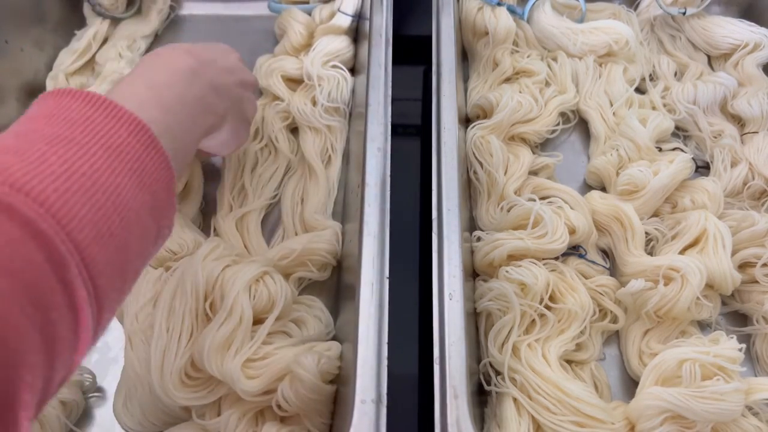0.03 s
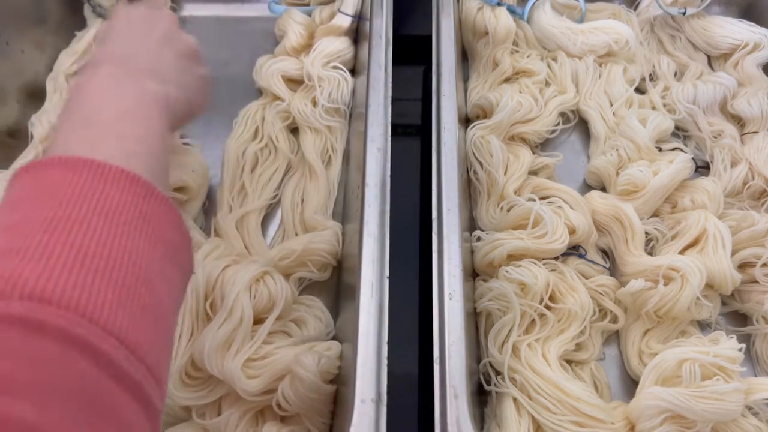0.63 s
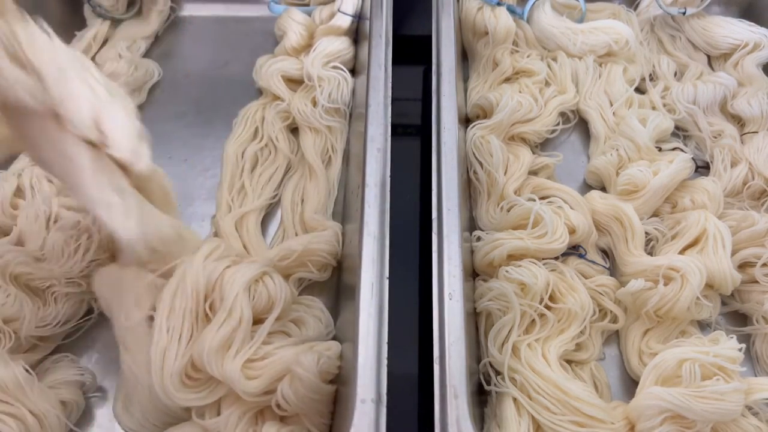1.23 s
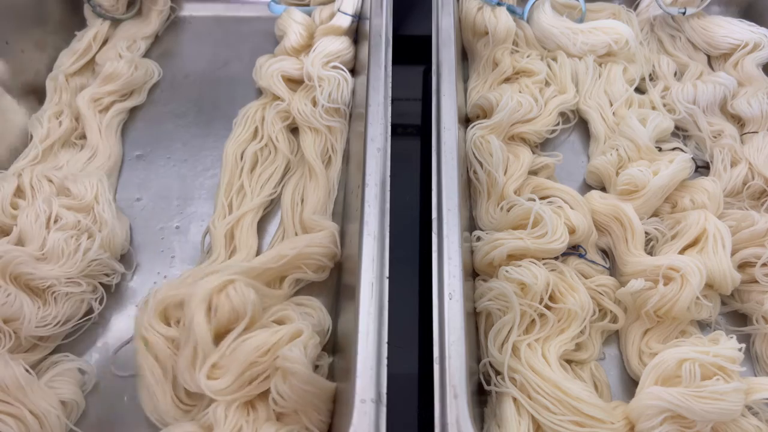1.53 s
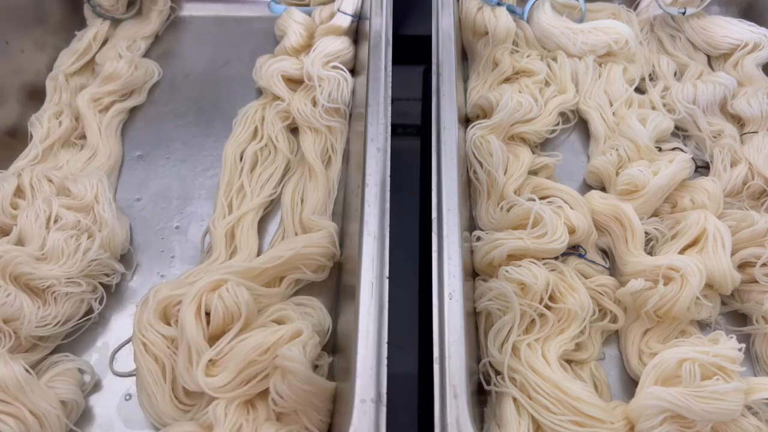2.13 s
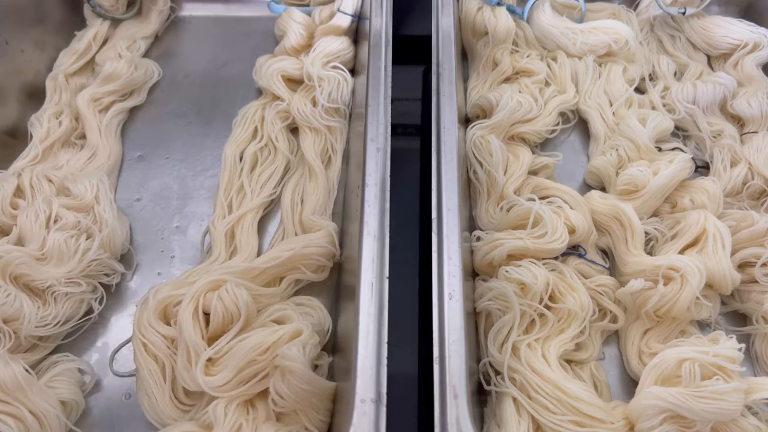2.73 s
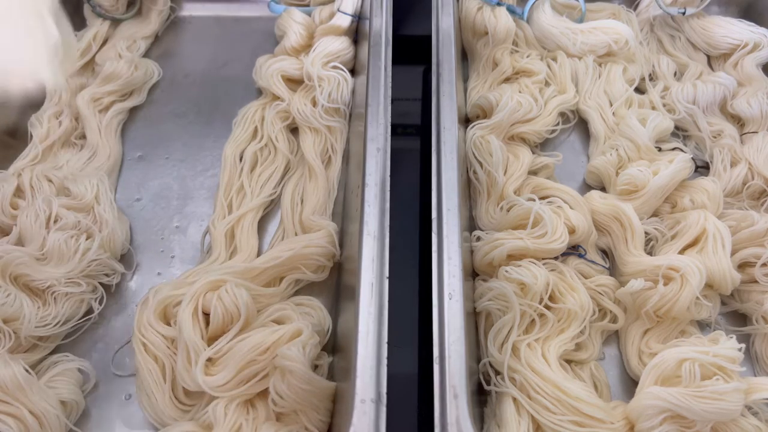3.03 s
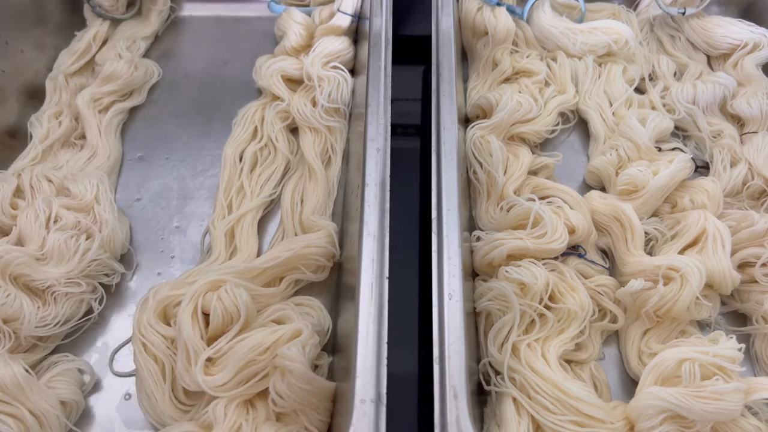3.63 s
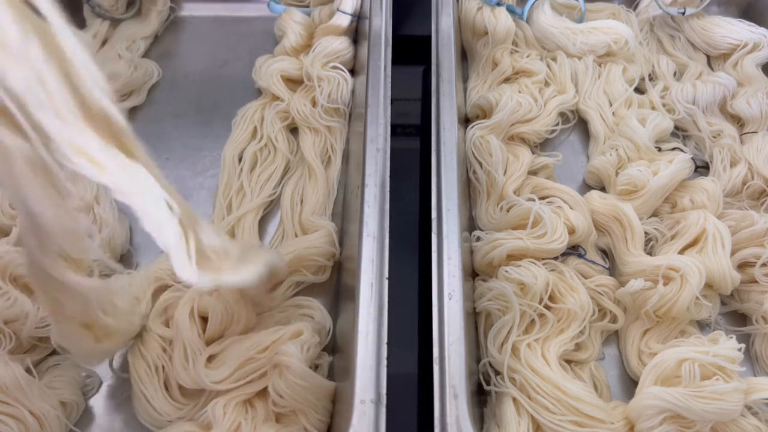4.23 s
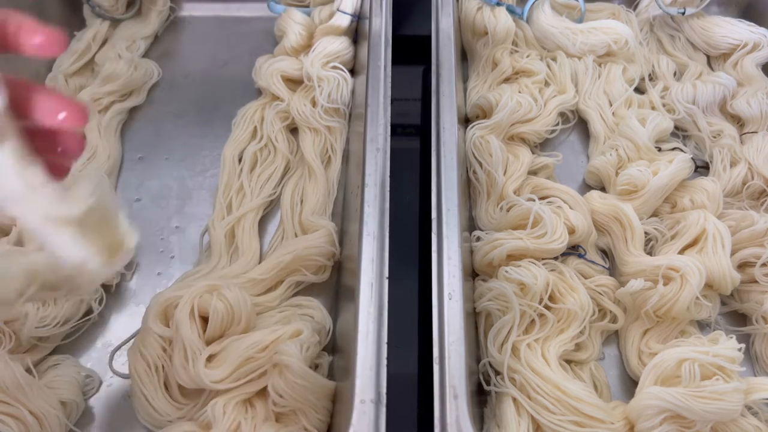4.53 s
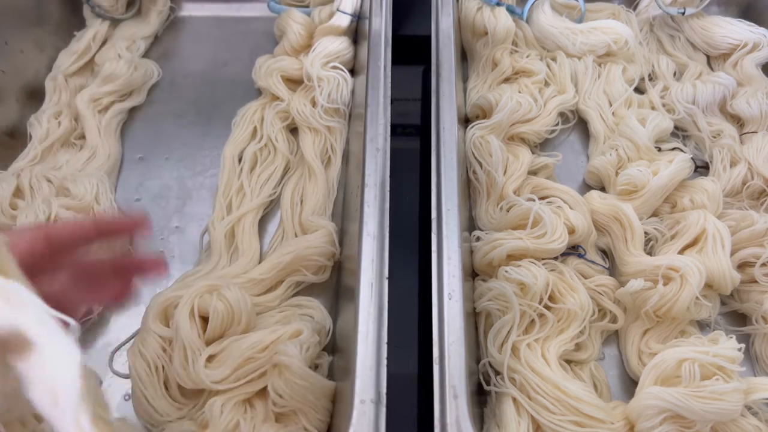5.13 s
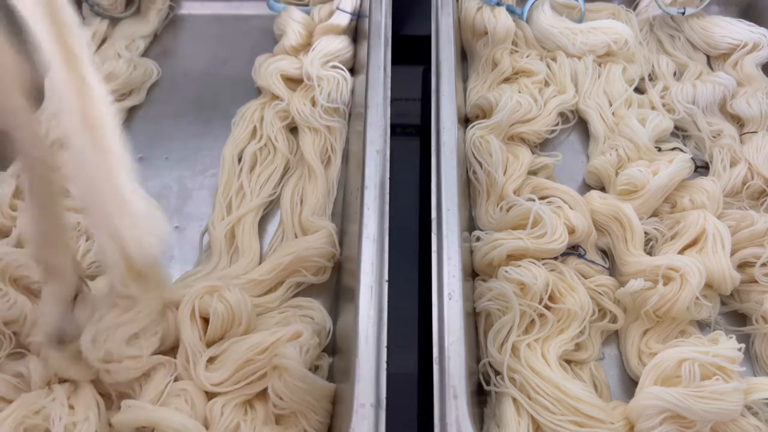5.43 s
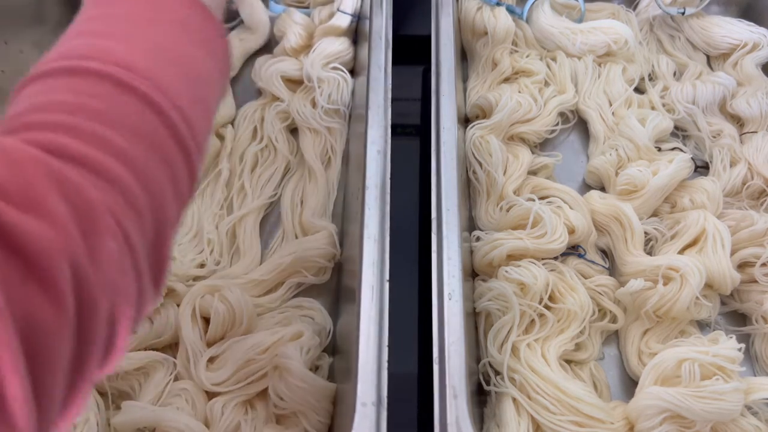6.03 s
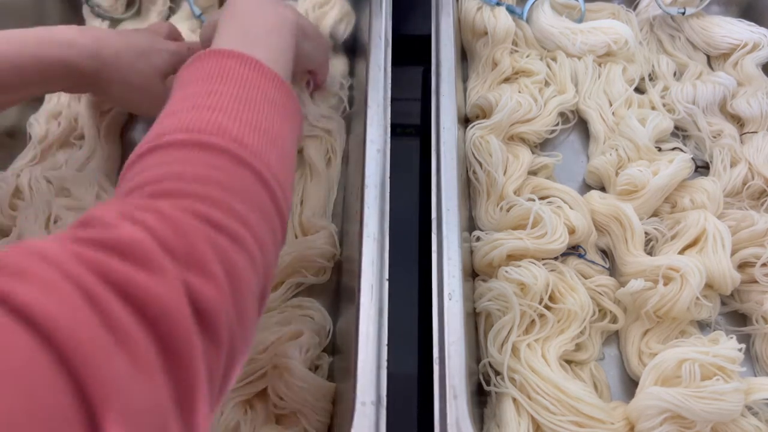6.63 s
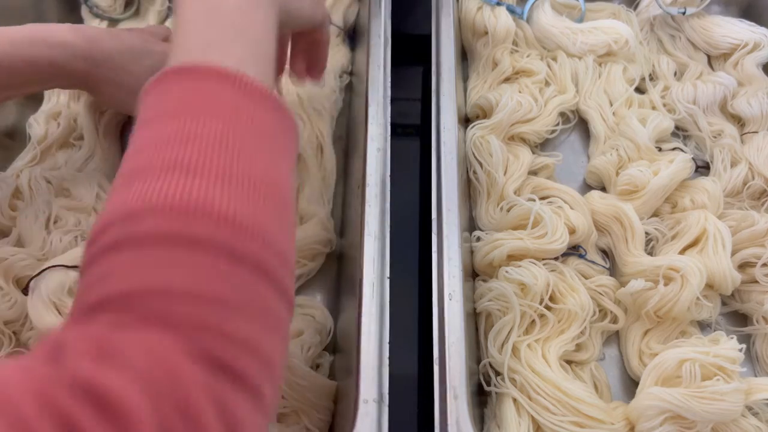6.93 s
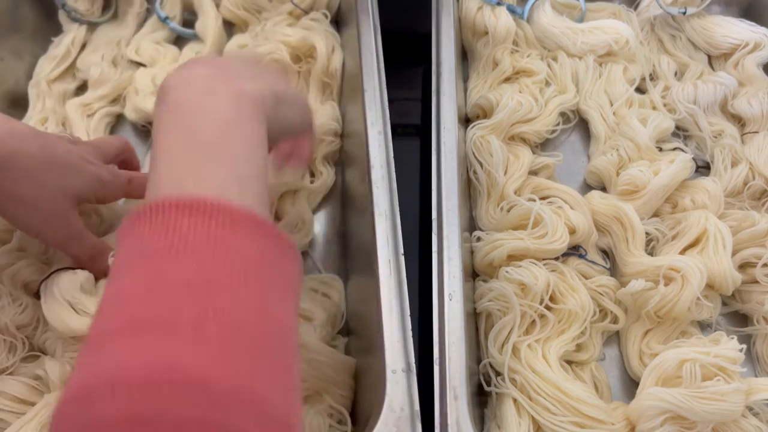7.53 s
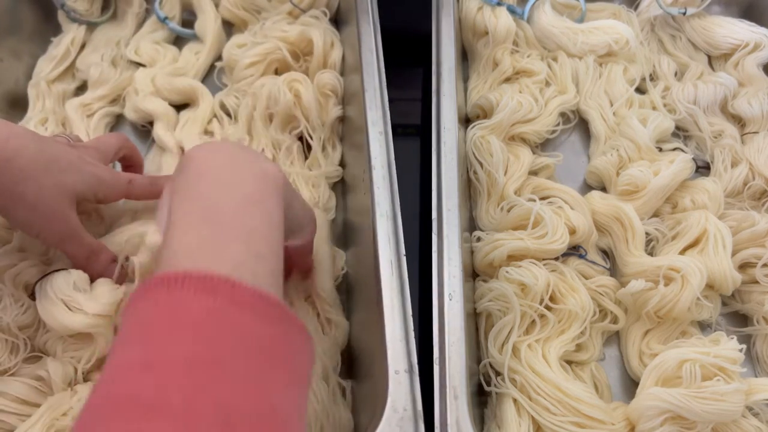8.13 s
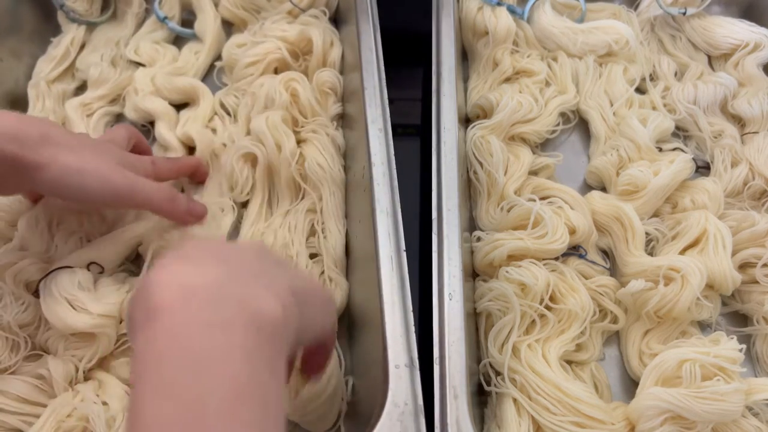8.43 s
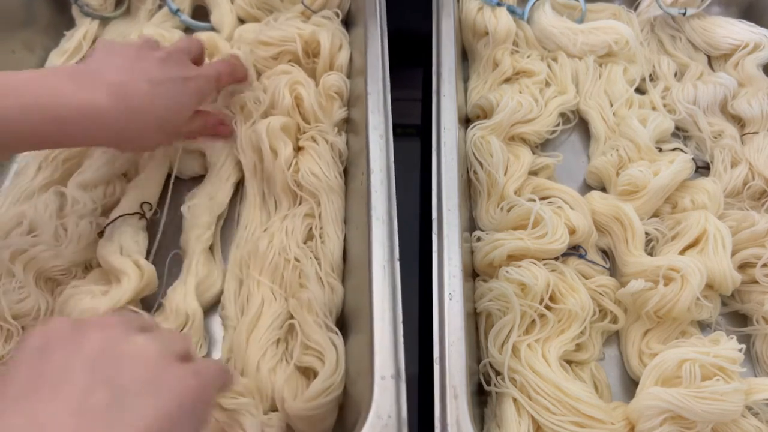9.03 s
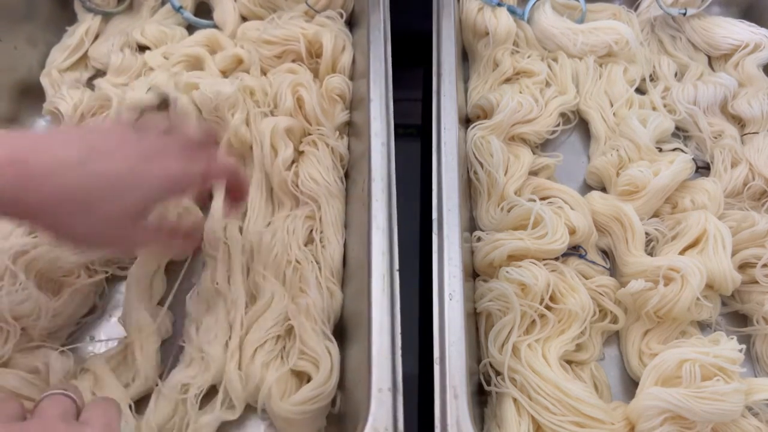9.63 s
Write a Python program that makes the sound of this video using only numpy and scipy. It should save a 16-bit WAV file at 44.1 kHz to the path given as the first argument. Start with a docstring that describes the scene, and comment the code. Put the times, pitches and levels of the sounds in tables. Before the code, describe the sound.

Wet yarn brushes and hisses softly close to the microphone, over the steady low rumble and hum of ventilation in a small work room. A few muffled thuds land in a steel pan before 1 second. Light rustling and tiny wet ticks follow, with a faint tap at 1.5 seconds. Skeins slap down with light knocks around 4.1 and 5.5 seconds, as the ticks thicken. At 5.9 seconds comes the loudest sound, a quick clattering knock that rings the steel. Smaller knocks and two short scrapes follow between 6.3 and 6.8 seconds. Yarn and a sleeve then swish in repeated strokes, with dull, booming thuds at 7.8 and 8.2 seconds. The rim clinks lightly at 8.8 seconds, and a firm wet slap hits the pan at 9.2 seconds. A last small knock and rustle come at about 9.7 seconds.

```python
"""A close rustle of wet yarn and a sleeve, then soft thuds: skeins are laid by hand in a steel pan.
Slipping fibres hiss and fizz, and strands part with tiny ticks. Each skein slaps down and booms
the pan floor; hard knocks ring the steel, joined by two short scrapes and a light clink on the rim.
Behind it all, the ventilation of a small work room rumbles and hums."""
import sys
import numpy as np
from scipy import signal
from scipy.fft import rfft, irfft, next_fast_len
from scipy.io import wavfile
from scipy.ndimage import uniform_filter1d

SR = 44100
rng = np.random.default_rng(int(sys.argv[2]) if len(sys.argv) > 2 else 0)


def transcribe(signal):
    """Save signal, clipped to [-1, 1], as a 16-bit WAV file at the path in sys.argv[1]."""
    frames = np.atleast_2d(signal).T
    limited = np.clip(frames, -1, 1)
    pcm = np.round(limited * 32767).astype(np.int16)
    wavfile.write(sys.argv[1], SR, pcm)


N = 435266

# soft blows of yarn and hand: start_s, floor_pitch_hz, pitch_drop_s, after_ring_db (against the
# first swing), boom_db, ring_db, ring_pitch_hz, slap_db
SOFT_BLOWS = [(.556, 140, 0.0025, -13, -45.5, -49.5, 290, -64.5),
              (.594, 149, 0.0016, -4, -47, -58, 270, -67.5), (.636, 70, .003, -10, -47, -61, 280, -78),
              (.714, 148, 0.0029, -7, -47, -49, 270, -63), (.752, 150, 0.0014, -12, -50, -55, 280, -73),
              (1.570, 112, 0.0033, -2, -53, -72, 300, -73),
              (4.117, 120, 0.0033, -20, -40.5, -42.5, 260, -52),
              (4.151, 112, 0.0019, -16, -39, -46, 260, -62.5),
              (5.557, 69, 0.00336, 9, -35.5, -42, 350, -45), (7.786, 132, .0029, -12, -36, -43, 304, -54.5),
              (8.196, 135, 0.0041, -9.5, -30, -37, 260, -48),
              (8.583, 126, 0.0027, -10, -45.5, -59, 300, -65.5),
              (9.246, 120, 0.0077, -15, -30, -29.5, 447, -42)]
# hard contacts with the steel: start_s, level_db, body_offset_db, brightness_db, spot_pitch_hz,
# spot_emphasis_db, clatter_t60_s, crack_strength
HARD_KNOCKS = [(1.485, -63, -13, -1, 1360, 26, .26, .25), (4.021, -57.5, -6.5, -2, 1000, 0, .11, .22),
               (4.152, -64, -9, 1, 3030, -11, .1, .88), (5.265, -68.5, -19, 10, 2500, -12, 0.2, .3),
               (5.506, -57, -1, -7, 1200, 1, .084, 0.91), (5.861, -25, -3, -4.5, 782, -0.5, .25, .8),
               (5.872, -33, -12, -0.5, 684, 0, 0.32, .5), (5.923, -31.5, -19, 0, 526, 4, 0.098, 2),
               (6.353, -58.5, 7.5, -9.5, 337, 11, 0.11, .12),
               (6.607, -47.5, -17, 8, 2180, 12.5, 0.11, 0.23), (6.620, -48.5, -8, -1.5, 900, 14, .2, .9),
               (6.665, -52.5, -8, -1, 1100, 8.5, 0.27, .2), (8.799, -51.5, -11, 1.5, 2280, 0, .09, 1.3),
               (9.246, -46, -15, 3.5, 1750, 9, 0.055, 2), (9.382, -65, -12, 5, 1600, 4, .08, .3),
               (9.704, -50.5, 1, -5, 610, -23, 0.17, 1.7)]
# ring, clatter and treble registers of a knock: offset_db, db_per_brightness_db
KNOCK_REGISTERS = [(-1.5, -0.59), (0.5, 0.8), (-5.5, 0.82)]
# modes of the steel pan: pitch_hz, level_db, base_t60_s
PAN_MODES = [(63.6, -14.5, 0.84), (133, -22.5, 0.71), (168.9, 3.5, 0.27), (225.5, -8.5, 0.56),
             (252.4, 6, 0.17), (308.5, 3.5, 0.18), (352, -1.5, 0.47), (390, 1.5, 0.62), (461, 0, 0.61),
             (499.5, 9, 0.29), (515.4, 7.5, 0.36), (615, 0.5, 0.4), (698, 7, 0.37), (731, -5.5, 0.2),
             (792, 6.5, 0.22), (829, -4, 0.36), (874, -1.5, 0.45), (1060, -10, .35), (1141, -1, 0.39),
             (1327, -8.5, 0.28), (1441, 8, 0.22), (1520, -7, 0.33), (1570, -6, 0.25), (1725, -6.5, 0.38),
             (2000, -8, 0.36), (2260, -7, 0.34), (2430, -8.5, 0.28), (3760, -2, 0.29), (3980, -6.5, 0.34),
             (4300, -13, 0.3), (4540, -5, 0.33), (4990, -1, 0.3), (5650, -5, 0.3)]
# hand and skein stroking the yarn: start_s, length_s, end_level_db, swell_db, brush_offset_db,
# fizz_offset_db
YARN_STROKES = [(.05, 0.18, -78, 15, 8, -1), (0.213, 0.068, -70.5, -8, 9.5, -2),
                (0.278, 0.35, -75.5, 1.5, 3, 2.5), (0.667, 0.21, -79.5, 0, 8, 4),
                (0.924, 0.41, -68.5, 3.5, 4.5, 0.5), (1.36, 0.21, -73.5, 1, 4, 3),
                (1.594, 0.72, -72, 1, 2.5, 3.5), (2.175, 0.19, -68.5, 21, 3, 6.5),
                (2.37, 0.43, -66.5, 11.5, 3, 4.5), (2.906, 0.21, -71.5, 13, 6.5, 2.5),
                (3.182, 0.16, -71.5, -2, -1, 3.5), (3.379, 0.16, -64.5, 0.5, 1.5, 3),
                (3.601, 0.11, -59, 1.5, -3.5, 1.5), (3.735, 0.28, -60, 4, -2, 1.5),
                (4.08, 0.49, -83, -15.5, 8, 3.5), (4.98, 0.39, -70, 9, 4, 3),
                (5.252, 0.02, -57, 3, -11, -3), (5.283, 0.11, -58.5, 2, 2.5, 0),
                (5.412, 0.2, -63.5, -3.5, 3.5, 0), (5.614, 0.28, -74, -3, 5.5, 0),
                (6.27, .1, -75.5, 2, -3, 1), (6.365, 0.044, -55.5, 1, 8, -6.5),
                (6.5, 0.21, -60, 14.5, 8, -5), (7.007, 0.36, -62, 12, 6.5, -3.5),
                (7.59, 0.22, -61, 8, 6.5, -3), (7.996, 0.2, -62.5, 13, 4.5, -1.5),
                (8.404, 0.48, -62.5, 5, 2.5, -2.5), (8.724, 0.26, -68.5, -6, 5.5, 1),
                (9.155, 0.34, -64, 5, 5.5, 0.5), (9.58, 0.24, -57, 15, 5, -3.5)]
# rubbing that goes on between strokes: brush_db, swish_db, fizz_db
RESTING_RUB = (-81, -93.5, -80)
# borders of the sleeve's crackle bands: edge_hz
SWISH_EDGES = [1500, 2900, 3700, 4700, 6000, 16000]
# wet strands parting: start_s, peak_db, centre_hz
STRAND_TICKS = [(1.3104, -47, 8500), (1.544, -53, 2400), (1.984, -45, 8500), (2.4696, -47, 9500),
                (2.609, -46, 9000), (3.020, -49, 7050), (3.036, -48, 7900), (3.6231, -45, 8500),
                (3.913, -47, 4270), (4.01, -42, 4730), (4.249, -51, 3300), (4.363, -50, 5870),
                (4.601, -51.5, 8800), (4.769, -52.5, 8600), (5.2055, -50, 8600), (5.340, -38.5, 3600),
                (5.347, -44, 2800), (5.376, -42, 4600), (5.419, -41, 5000), (5.478, -42.5, 2380),
                (5.506, -35.5, 8500), (5.611, -46, 3600), (8.633, -56, 7900), (9.256, -37, 7500),
                (9.669, -46, 7500), (9.719, -51, 6000)]
# drags on the steel: start_s, length_s, level_db, low_pitch_hz, high_pitch_hz, high_offset_db, t60_s
STEEL_SCRAPES = [(6.391, 0.032, -59, 2630, 4530, 4, 0.11), (6.627, 0.12, -57.5, 1550, 1800, -3.5, 0.32)]
# light touches on the rim: start_s, level_db
RIM_TOUCHES = [(8.776, -63), (8.799, -47)]
# modes of the rim: pitch_hz, level_db, t60_s
RIM_MODES = [(1990, -7, 0.22), (2070, 1, 0.082), (2530, -0.5, 0.057), (3680, -2.5, 0.069), (4500, -11, .16),
             (4915, -15, .18), (7000, 1, .018), (8150, -5, .05)]
# EQ curves of slap, knock, brushing yarn, sleeve, wet fizz and vent air: frequency_hz, gain_db
SLAP_EQ = [(50, -4), (300, -0.5), (520, -7.5), (900, -9), (2200, -19), (4000, -19.5), (8000, -26.5),
           (15000, -33)]
KNOCK_EQ = [(60, -21), (170, -1), (300, -16.5), (400, -6), (550, 4), (850, -6), (1080, -9), (1520, -10),
            (2200, -8), (2900, -16.5), (4000, -11.5), (5500, -14.5), (8000, -15.5), (12500, -31.5),
            (15500, -30)]
BRUSH_EQ = [(250, -19), (500, 5), (900, 0.5), (1500, 1.5), (2400, 2.5), (4000, -18.5), (8000, -18)]
SWISH_EQ = [(1500, -27), (2800, 3), (4200, 3), (5200, 2.5), (6500, -0.5), (8500, 4), (11000, -20),
            (15000, -28.5)]
FIZZ_EQ = [(4000, -22), (6500, -6), (8000, 0), (12000, -1.5), (15500, -2.5)]
AIR_EQ = [(15, -81), (25, -27.5), (40, -0.5), (64, 5.5), (77, -3.5), (87, -17.5), (108, -12), (145, -15.5),
          (163, -13), (284, -8), (429, -16.5), (523, -15), (650, -27.5), (1120, -31.5), (1800, -39),
          (2250, -35), (2600, -36.5), (2850, -42), (3640, -55), (6160, -120)]
# partials of the ventilation motor: pitch_hz, level_db
MOTOR_HUM = [(59.3, -51.3), (74, -60), (118.6, -62.5), (148, -68), (172.5, -64), (215.5, -61), (258, -65),
             (281, -63), (344.5, -64)]
# stereo likeness; short waves reach the two microphone ports out of step: frequency_hz, correlation
STEREO_LIKENESS = [(60, .99), (150, .95), (280, .68), (600, .3), (1400, .15), (7500, 0), (9000, -.6),
                   (9700, -.97), (10700, -.97), (11400, .3), (12500, .9), (14000, .8), (15500, .3)]
# balance of the microphone ports: frequency_hz, left_minus_right_db
PORT_BALANCE = [(60, 1), (250, 0.4), (550, 2.5), (1100, 1), (2300, 3.5), (4000, 5.5), (5600, 9.5),
                (7500, 4), (10000, -7), (15000, 3)]

HIT_S, ATTACK_S = .6, .045  # length of a hit, and the opening stretch that sets its level
SWING_S, FLOOR_T60_S = .0075, .52  # the pan floor's first swing peaks, then it rings on
SPRAY_DB, MID_SLAP_DB, SPRAY_GROWTH = -66, -50, 1.75  # spray at a middling slap; dB per dB of slap
GRIP_S, SETTLE_S = .072, .071  # attack and release of a stroke; short strokes are quicker


def skein_thuds():
    """Wet yarn lands: a slap, a spray, a muffled ring and one wide, smothered swing of the pan floor."""
    out, t = np.zeros((2, N)), times(HIT_S)
    modes = pan_modes(t, damping=1.3)
    for start_s, floor_hz, drop_s, after_db, boom_db, ring_db, ring_hz, slap_db in SOFT_BLOWS:
        # short bending waves run fastest, so the pitch drops onto that of the loaded floor
        hz = floor_hz + 650 * np.exp(-t / drop_s)
        swing = t / SWING_S * np.exp(1 - t / SWING_S)
        after_ring = undb(after_db) * fade(t, FLOOR_T60_S) * (1 - np.exp(-t / .011))
        flex = (swing + after_ring) * np.sin(2 * np.pi * np.cumsum(hz) / SR)
        slap = contact(t, crack=.9, crack_s=.00176, early_t60=.077, room_t60=.34, room_db=-5)
        slap = eq(slap, SLAP_EQ)
        steel = pan_ring(modes)
        body = hit_level(slap, 0) + hit_level(band(steel, 170, 500), -11)
        ring = struck_spot(body, ring_hz, -2.1, q=3.8)
        linger = band(diffuse(len(t)), 91, 194) * fade(t, .56) * (1 - np.exp(-t / .0076))
        boom = hit_level(np.array([flex, flex]), 0) + hit_level(linger, -6)
        boom += hit_level(band(steel, 52, 131), -5)
        spray = contact(t, crack=4.5, crack_s=.0016, early_t60=.066, room_t60=.33, room_db=-4)
        spray_db = SPRAY_DB + SPRAY_GROWTH * (slap_db - MID_SLAP_DB)
        thud = (hit_level(boom, boom_db)
                + hit_level(band(ring, 202, 680), ring_db)
                + hit_level(band(slap, 730, 3030), slap_db)
                + hit_level(band(eq(spray, SLAP_EQ), 3810, 19000), spray_db))
        add(out, thud, start_s)
    return out


def steel_knocks():
    """Hard contacts ring the steel; a brighter one shifts its weight into the high registers."""
    out, t = np.zeros((2, N)), times(HIT_S)
    edges_hz = [130, 280, 1000, 3100, 17000]  # body, ring, clatter, treble
    modes = pan_modes(t, damping=.88)
    for start_s, knock_db, body_db, bright_db, spot_hz, spot_db, t60, crack in HARD_KNOCKS:
        register_db = [knock_db + body_db]
        register_db += [knock_db + db + tilt * bright_db for db, tilt in KNOCK_REGISTERS]
        clatter = contact(t, 1.27 * crack, crack_s=.0027, early_t60=t60, room_t60=.42, room_db=-5.5)
        # only a heavy blow sets the whole pan ringing
        ring_db = max(-2.5 + .42 * (register_db[1] + 36), -8)
        steel = hit_level(eq(clatter, KNOCK_EQ), 0) + hit_level(pan_ring(modes), ring_db)
        steel = struck_spot(steel, spot_hz, spot_db, q=3.9)
        steel = struck_spot(steel, 1.61 * spot_hz, spot_db - 12.5, q=18.6)  # weaker overtone
        for lo, hi, db in zip(edges_hz, edges_hz[1:], register_db):
            add(out, hit_level(band(steel, lo, hi), db), start_s)
        # the instant of contact is the brightest
        snap = band(diffuse(len(t)), 7000, 17000) * np.exp(-t / .006)
        add(out, np.sqrt(crack) * hit_level(snap, register_db[-1] - 12), start_s)
    return out


def contact(t, crack, crack_s, early_t60, room_t60, room_db):
    """A push and a crack, a flurry of sheet vibration, then a room tail whose treble dies first."""
    push = .41 * np.sin(np.pi * np.minimum(t / .00032, 1))
    direct = push + diffuse(len(t)) * (fade(t, early_t60) + crack * np.exp(-t / crack_s))
    room = diffuse(len(t))
    tail = band(room, 42, 4900) * fade(t, room_t60) + band(room, 6700, 15000) * fade(t, room_t60 / 2)
    return direct + undb(room_db) * tail * (1 - np.exp(-t / .0041))


def pan_modes(t, damping):
    """Each mode of the pan is a beating cluster of three, spread wider higher up."""
    hz, db, t60 = np.transpose(np.repeat(PAN_MODES, 3, axis=0))[:, :, None]
    spread = np.tile([-1, 0, 1], len(PAN_MODES))[:, None] * rng.uniform(.6, 1.6, hz.shape)
    detune_hz = (5 + .005 * hz) * spread
    return undb(db) * fade(t, t60 / damping) * np.exp(2j * np.pi * (hz + detune_hz) * t)


def pan_ring(modes):
    """Each blow wakes its own mix of modes; high ones reach left and right out of step."""
    hz = np.repeat(np.array(PAN_MODES)[:, 0], 3)
    strength, skew = rng.standard_normal((2, len(hz)))
    phase = rng.uniform(0, 2 * np.pi, len(hz)) + np.outer([1, -1], skew * np.minimum(hz / 800, .9))
    return ((undb(2 * strength) * np.exp(1j * phase)) @ modes).imag


def struck_spot(x, hz, db, q):
    """The place that is struck favours one region of the pan's ringing."""
    return x + undb(db) * signal.lfilter(*signal.iirpeak(min(hz, .4 * SR), q, fs=SR), x)


def yarn_rustle():
    """Yarn brushes over yarn, the sleeve swishes, wet fibres fizz."""
    brush_gain, swish_gain, fizz_gain = stroke_envelopes()
    brush = eq(fibres(slips_per_s=510, spread_db=4, grain_db=-24.5), BRUSH_EQ)
    # as different strands catch, the emphasis wanders from band to band
    cloth = np.zeros((2, N))
    for lo, hi in zip(SWISH_EDGES, SWISH_EDGES[1:]):
        crackle = fibres(slips_per_s=260, spread_db=3.5, grain_db=-4.5)
        cloth += band(crackle, lo, hi) * undb(1.7 * drift(16))
    swish = eq(cloth, SWISH_EQ)
    fizz = eq(fibres(slips_per_s=420, spread_db=4.4, grain_db=-3.5), FIZZ_EQ)
    return (level(brush, -4.5) * brush_gain
            + level(swish, .26) * swish_gain
            + level(fizz, .5) * fizz_gain)


def stroke_envelopes():
    """Gains of brush, swish and fizz: a stroke takes hold, swells or eases as it pulls, then settles."""
    power, t = np.zeros((3, N)), times(1.2)
    for start_s, length_s, end_db, swell_db, brush_db, fizz_db in YARN_STROKES:
        grip = np.sin(np.pi / 2 * np.minimum(t / min(GRIP_S, length_s), 1)) ** 2
        pull = undb(end_db + swell_db * (np.minimum(t / length_s, 1) - 1))
        settle = np.exp(-np.maximum(t - length_s, 0) / min(SETTLE_S, 1.2 * length_s))
        add(power, np.outer(undb([brush_db, 0, fizz_db]), grip * pull * settle) ** 2, start_s)
    return np.sqrt(power + undb(RESTING_RUB)[:, None] ** 2)


def fibres(slips_per_s, spread_db, grain_db):
    """Countless fibre slips merge into a fluttering hiss; a few wet ones stand out as grain."""
    slips = (rng.random(N) < slips_per_s / SR) * rng.choice([-1, 1], N)
    slips = slips * undb(spread_db * np.minimum(rng.exponential(size=N), 5))
    grain = np.array([slips, np.roll(slips, 2)])  # reaches the right side a little later
    hiss = level(diffuse(N), 0) + level(grain, grain_db)
    return hiss * undb(.9 * drift(45) + 1.3 * drift(220))


def strand_ticks():
    """Wet strands part with ticks a millisecond or two long; thicker strands sound lower."""
    out, t = np.zeros((2, N)), times(.05)
    envelope = np.exp(-t / .0018) + .16 * np.exp(-t / .014)
    for start_s, peak_db, hz in STRAND_TICKS:
        tick = band(diffuse(len(t)) * envelope, hz / 1.31, hz * 1.29)
        add(out, tick / np.abs(tick).max() * undb(peak_db), start_s)
    return out


def rim_clinks():
    """Something small and hard touches the rim, which pings briefly."""
    out, t = np.zeros((2, N)), times(HIT_S)
    hz, db, t60 = np.transpose(RIM_MODES)[:, :, None]
    for start_s, clink_db in RIM_TOUCHES:
        phase = rng.uniform(0, 2 * np.pi, hz.shape) + .7 * rng.standard_normal((2, *hz.shape))
        ping = (undb(db) * fade(t, t60) * np.sin(2 * np.pi * hz * t + phase)).sum(axis=1)
        add(out, hit_level(ping, clink_db), start_s)
    return out


def steel_scrapes():
    """Uneven stick and slip swells and lets go, making two regions of the steel sing."""
    out, t = np.zeros((2, N)), times(.5)
    for start_s, length_s, db, low_hz, high_hz, high_db, t60 in STEEL_SCRAPES:
        pressure = np.sin(np.pi * np.minimum(t / length_s, 1))
        slips = (rng.random(len(t)) < 900 / SR) * rng.standard_normal(len(t)) * pressure
        for hz, note_db in ((low_hz, db), (high_hz, db + high_db)):
            resonance = band(diffuse(len(t)) * fade(t, t60), hz / 1.08, hz * 1.08)
            scrape = signal.fftconvolve(resonance, slips[None])[:, :len(t)]
            add(out, level(scrape, note_db, 1.1 * length_s), start_s)
    return out


def ventilation():
    """Low rushing air, a thin hiss and a wavering motor hum with a faint buzz in its high harmonics."""
    t = np.arange(N) / SR
    air = level(eq(band(diffuse(N), 84, 2320), AIR_EQ), -52) * undb(.9 * drift(1.536))
    rumble = level(band(diffuse(N), 51, 85), -71)
    hiss = level(band(diffuse(N), 2480, 17000), -85)
    hum = sum(undb(db + .8 * drift(2.5)) * np.sin(2 * np.pi * hz * t + .35 * drift(1.5))
              for hz, db in MOTOR_HUM)
    motor_hz = MOTOR_HUM[0][0]
    buzz = sum(undb(2.8 * drift(2.8)) * np.sin(2 * np.pi * (harmonic * motor_hz * t + rng.random()))
               for harmonic in range(34, 47))
    return air + rumble + hiss + hum + undb(-87) * buzz


def diffuse(size):
    """White stereo noise, near mono in the bass, its width changing with frequency."""
    padded = 2 * next_fast_len(size // 2 + 1)
    mid, side = rfft(rng.standard_normal((2, padded)))
    alike = curve(STEREO_LIKENESS, padded)
    mid, side = mid * np.sqrt((1 + alike) / 2), side * np.sqrt((1 - alike) / 2)
    return irfft(np.array([mid + side, mid - side]))[:, :size]


def drift(rate_hz):
    """Smooth random modulation with a spread near 1."""
    hold = int(SR / rate_hz)
    steps = np.repeat(rng.standard_normal(N // hold + 1), hold)
    return 1.3 * uniform_filter1d(uniform_filter1d(steps, hold), hold)[:N]


def curve(points, size):
    """Spread (Hz, value) points over the bins of a size-sample FFT, on a log-frequency axis."""
    hz, value = np.transpose(points)
    bins_hz = np.arange(size // 2 + 1) * SR / size
    return np.interp(np.log(bins_hz + 1e-9), np.log(hz), value)


def eq(x, points):
    """Minimum-phase EQ through (Hz, dB) points."""
    size = 2 * next_fast_len(x.shape[-1] // 2 + 4096)
    cepstrum = irfft(np.log(undb(curve(points, size))))
    cepstrum[1:size // 2] *= 2
    cepstrum[size // 2 + 1:] = 0
    return irfft(rfft(x, size) * np.exp(rfft(cepstrum)))[..., :x.shape[-1]]


def band(x, lo_hz, hi_hz):
    """Causal band-pass."""
    sos = signal.butter(3, [lo_hz, min(hi_hz, .45 * SR)], "band", fs=SR, output="sos")
    return signal.sosfilt(sos, x)


def level(x, db, seconds=None):
    """Set the rms of the stereo centre, over the whole sound or its first seconds."""
    centre = x.mean(axis=0)[:int(seconds * SR) if seconds else None]
    return x * undb(db) / np.sqrt(np.mean(centre ** 2))


def hit_level(x, db):
    """Set a hit's level by its attack."""
    return level(x, db, ATTACK_S)


def undb(db):
    """Decibels to gain."""
    return 10 ** (np.asarray(db) / 20)


def times(seconds):
    """Time axis in seconds."""
    return np.arange(int(seconds * SR)) / SR


def fade(t, t60):
    """Decay by 60 dB in t60 seconds."""
    return np.exp(-np.log(1000) * t / t60)


def add(out, sound, start_s):
    """Mix a sound in at its cue."""
    start = int(start_s * SR)
    out[:, start:start + sound.shape[1]] += sound[:, :N - start]


def scene():
    """The pan and the yarn up close, over a bed of ventilation."""
    pan = skein_thuds() + steel_knocks() + rim_clinks() + steel_scrapes()
    return pan + strand_ticks() + yarn_rustle() + ventilation()


def record(dry):
    """The microphone's right port is shaded in the presence range; the top is cut at 15.9 kHz."""
    size = next_fast_len(N + 4096, True)
    lean = undb(curve(PORT_BALANCE, size))
    gains = np.array([lean, np.ones_like(lean)]) / np.sqrt((1 + lean ** 2) / 2)
    heard = irfft(rfft(dry, size) * gains, size)[:, :N]
    return signal.sosfilt(signal.ellip(8, .2, 70, 15900, fs=SR, output="sos"), heard)


dry = scene()
out = record(dry)
transcribe(out)
```